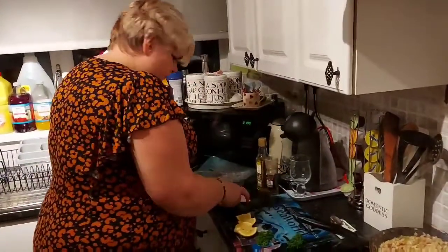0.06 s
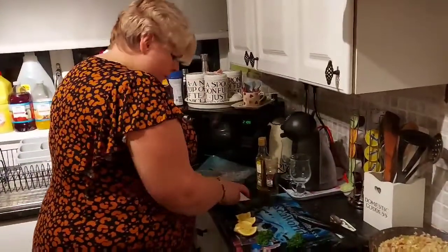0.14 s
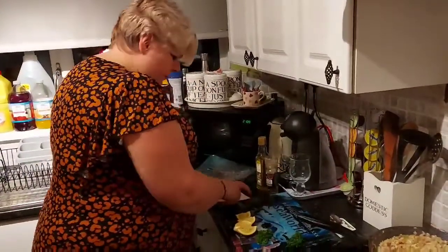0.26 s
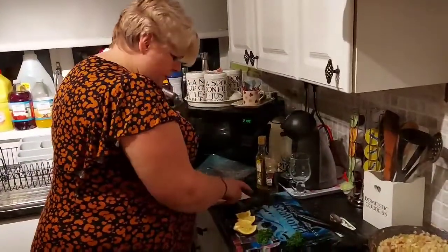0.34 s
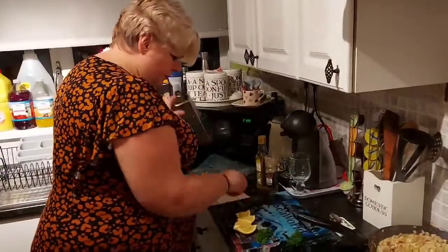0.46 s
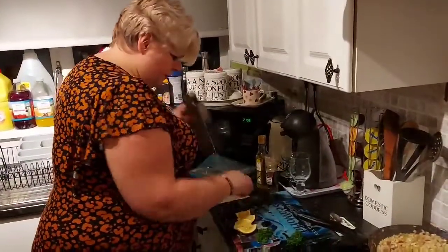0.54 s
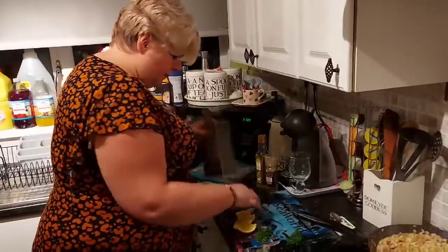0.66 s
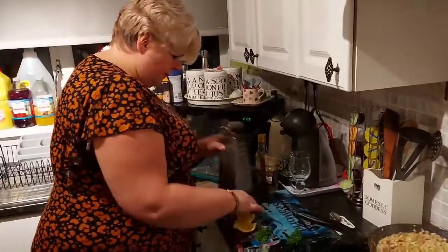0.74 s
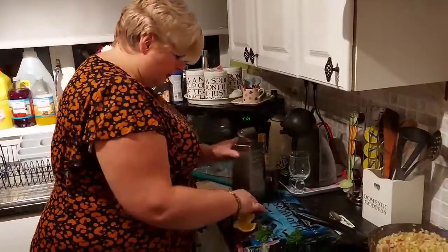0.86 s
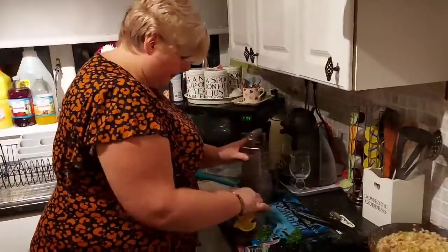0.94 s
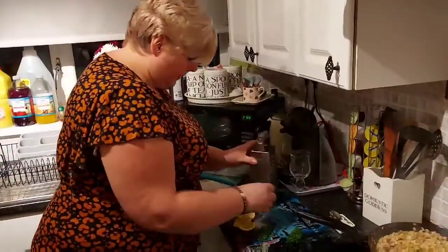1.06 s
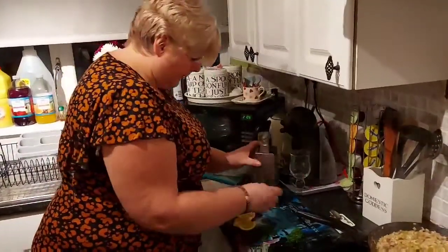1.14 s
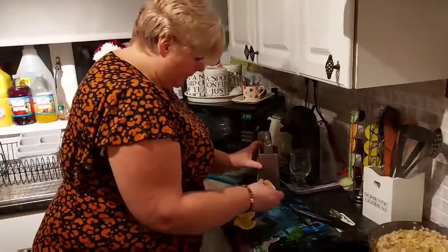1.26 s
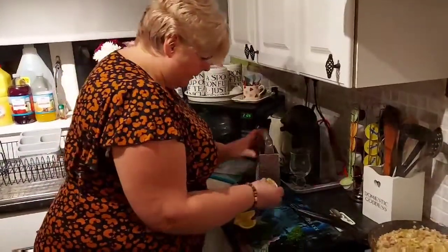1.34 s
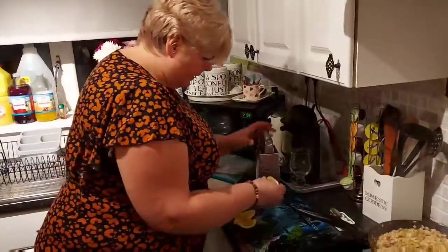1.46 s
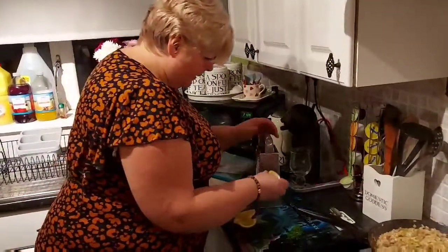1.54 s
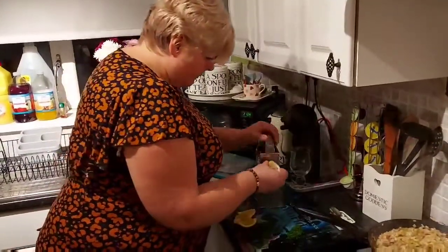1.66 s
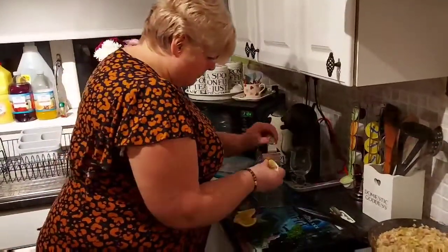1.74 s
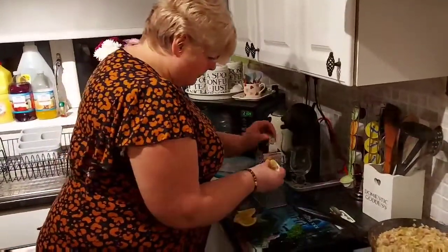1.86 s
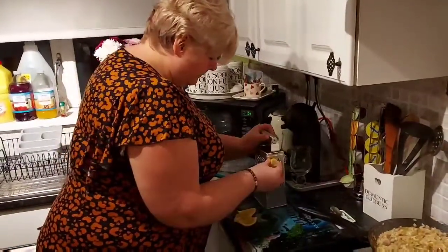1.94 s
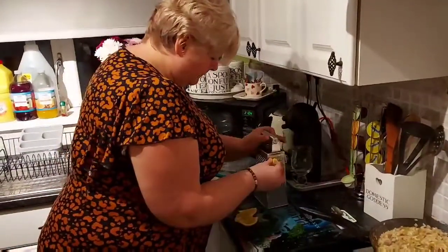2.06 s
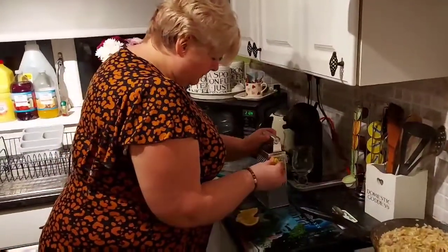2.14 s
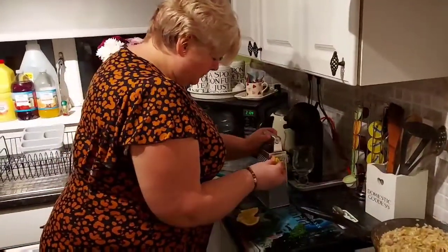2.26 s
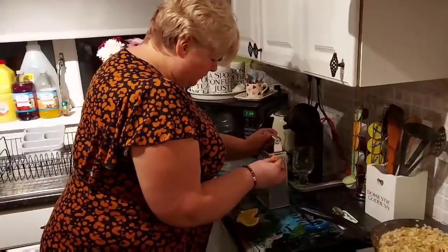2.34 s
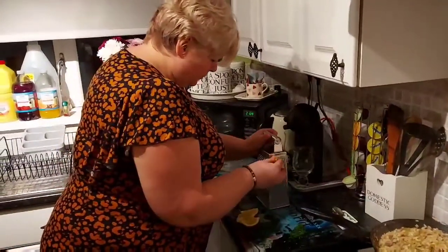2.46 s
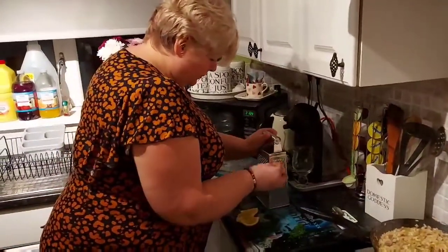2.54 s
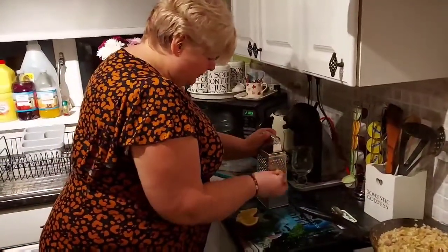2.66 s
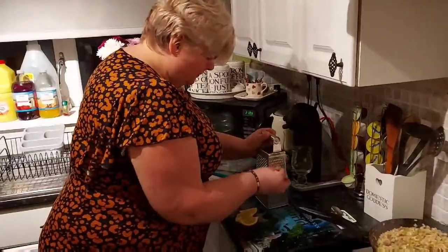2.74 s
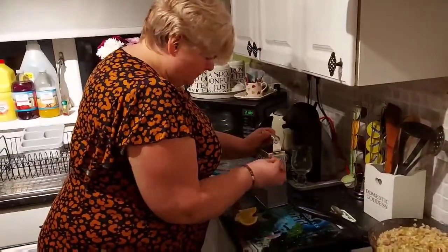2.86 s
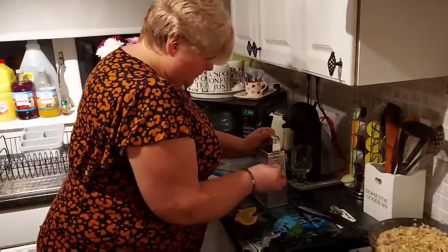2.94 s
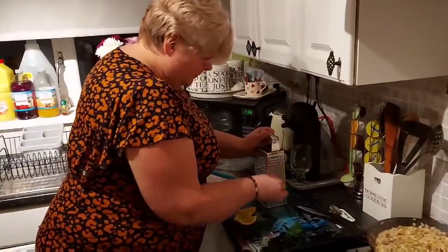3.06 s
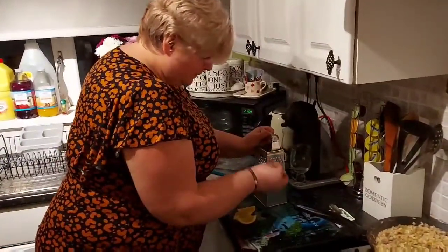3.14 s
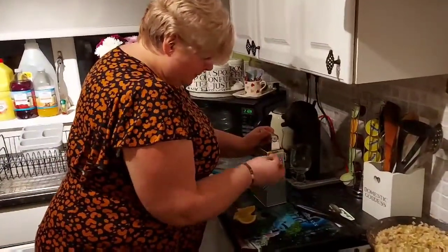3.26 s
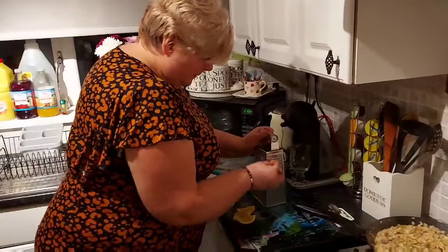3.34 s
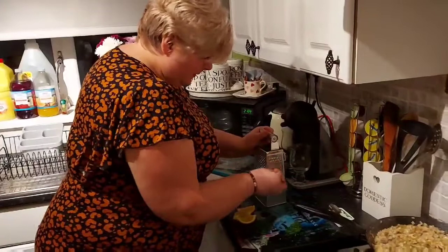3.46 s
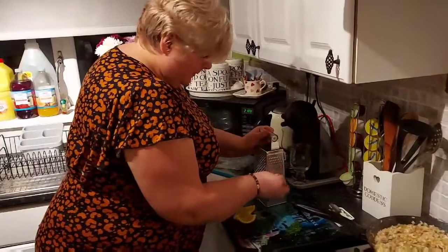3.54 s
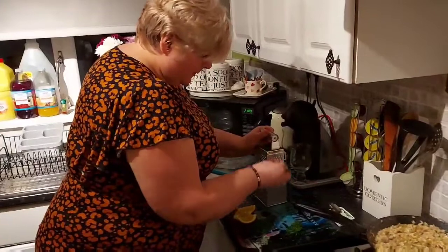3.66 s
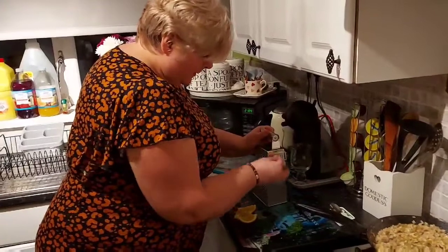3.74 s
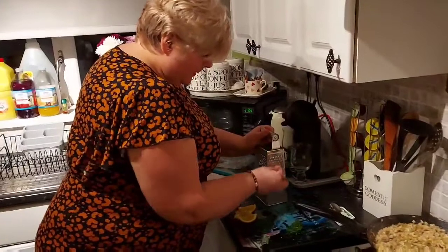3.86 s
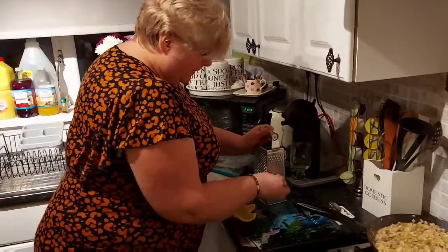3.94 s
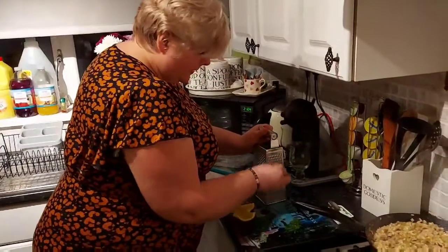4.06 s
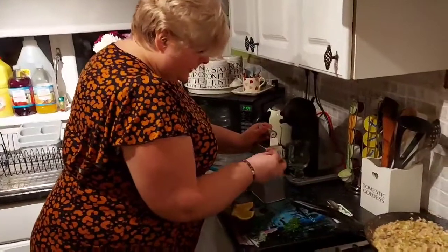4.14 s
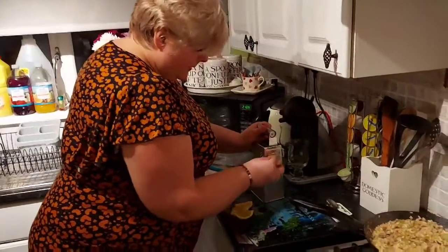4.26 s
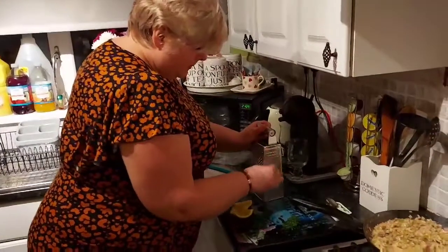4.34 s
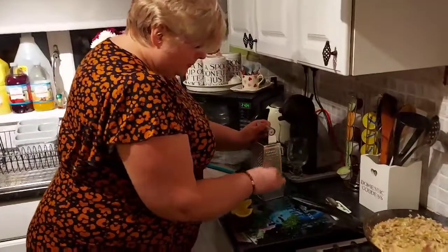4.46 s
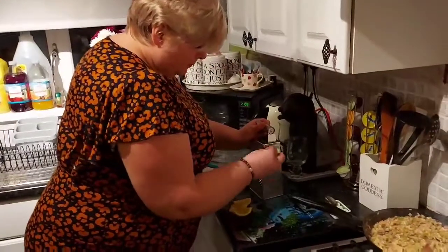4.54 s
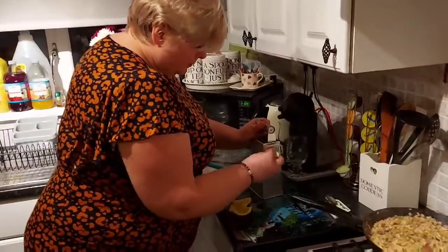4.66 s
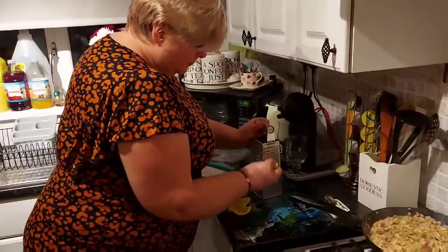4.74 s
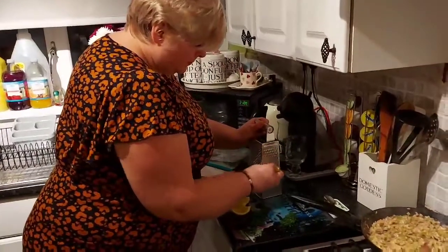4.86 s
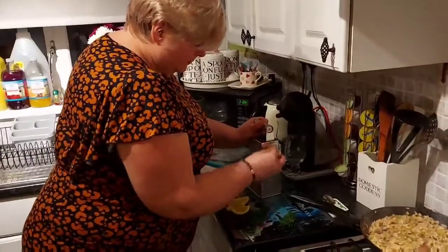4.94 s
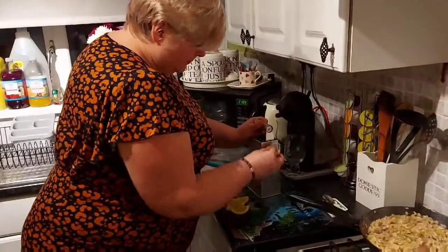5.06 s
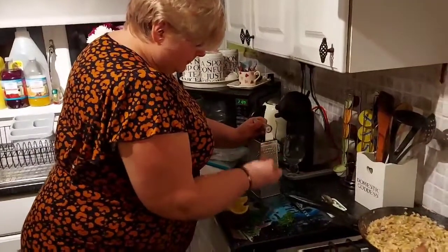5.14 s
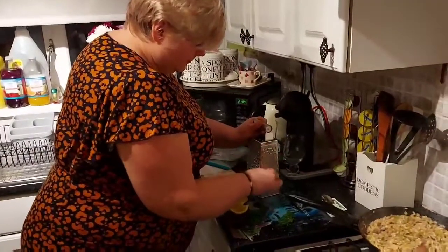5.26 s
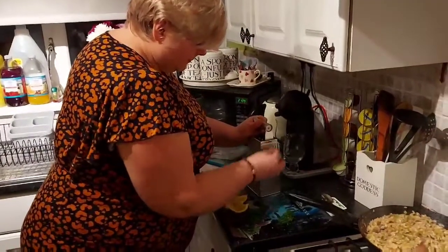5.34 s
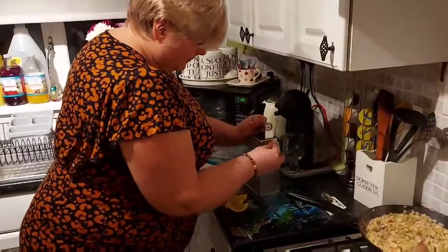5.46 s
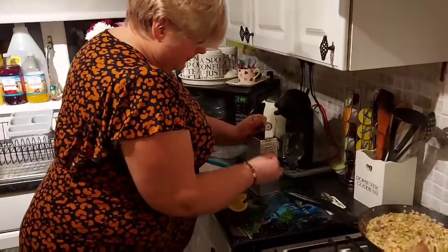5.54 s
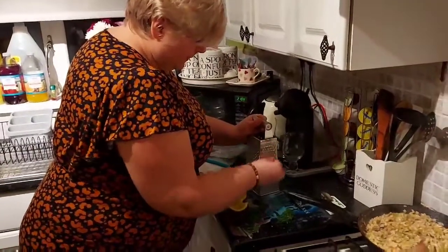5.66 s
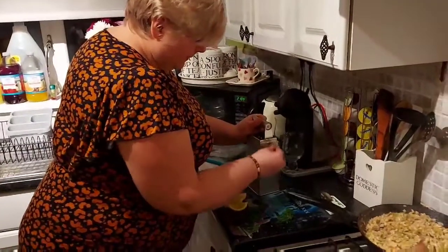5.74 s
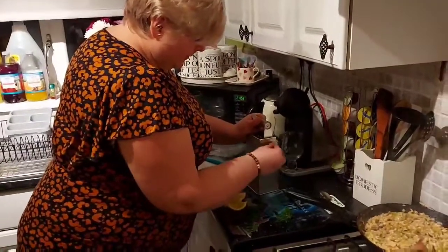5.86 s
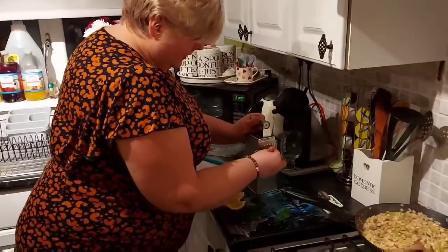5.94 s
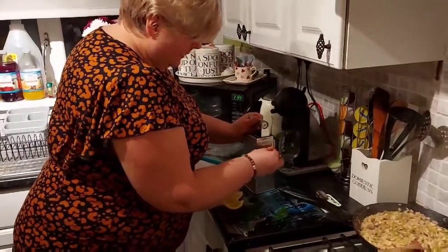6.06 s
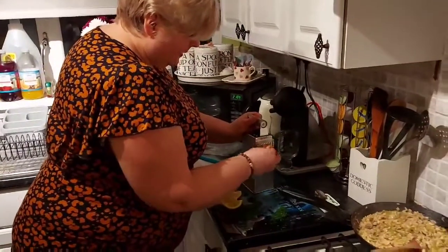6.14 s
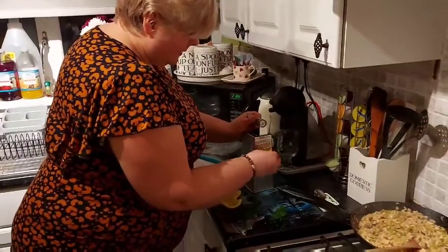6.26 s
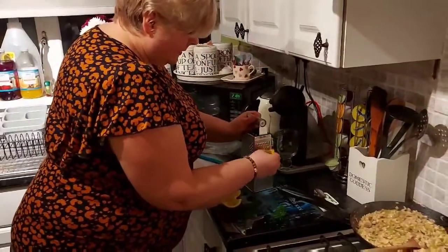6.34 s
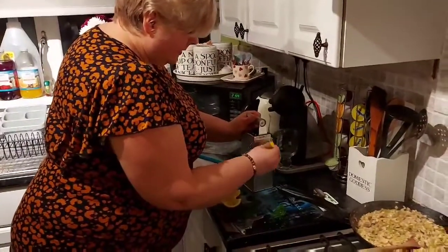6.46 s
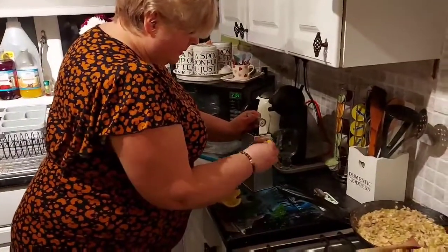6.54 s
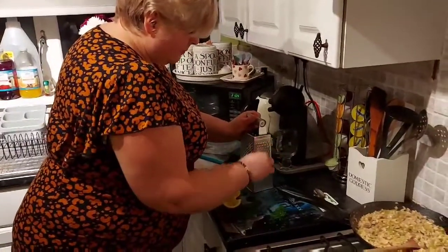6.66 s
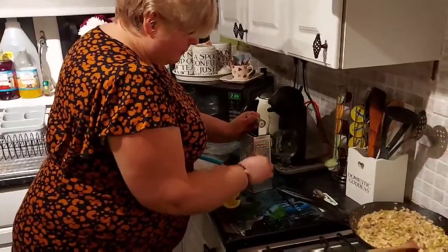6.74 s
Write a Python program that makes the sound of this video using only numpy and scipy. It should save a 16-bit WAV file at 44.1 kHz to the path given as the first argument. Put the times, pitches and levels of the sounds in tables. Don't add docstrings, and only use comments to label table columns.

```python
import sys
import numpy as np
from scipy import signal
from scipy.io import wavfile
from scipy.ndimage import uniform_filter1d

SR = 44100
rng = np.random.default_rng(int(sys.argv[2]) if len(sys.argv) > 2 else 0)


def digitize_waveform(pressure):
    field = np.atleast_2d(pressure).T
    bounded = np.clip(field, -1, 1)
    quanta = np.round(bounded * 32767).astype(np.int16)
    wavfile.write(sys.argv[1], SR, quanta)


def boost_factor(decibels):
    exponent = np.asarray(decibels, float) / 20
    return 10 ** exponent


N = 299412

# freq_hz, density_db_per_hz
HISS_SPECTRUM = [(20, -66), (70, 5), (105, -4), (170, -5.5), (400, -13), (1000, -10.5), (1400, -2),
                 (1900, -7.5), (3000, -7), (4200, -2), (5500, -5), (7500, -6.5), (11200, -5), (12400, 0),
                 (13500, -13)]
# freq_hz, likeness
HISS_LIKENESS = [(60, 0.87), (230, 0.53), (890, -0.031), (3440, -0.047), (13300, -0.023)]
# freq_hz, t60_s
KITCHEN_T60 = [(100, 0.49), (1000, 0.24), (4000, 0.23), (12000, 0.17)]
# freq_hz, likeness
ECHO_LIKENESS = [(60, 1), (300, 0.78), (700, 0.45), (1500, 0.17), (13000, 0.21)]
# start_s, peak_db, ring_hz
TICKS = [
    (0.182, -32, 5780),
    (0.5628, -41.5, 2290),
    (0.5714, -43, 2190),
    (0.589, -63, 4300),
    (0.6006, -46, 4260),
]
# start_s, peak_db
BUMPS = [
    (0.249, -61),
    (0.268, -49.5),
    (0.279, -47),
    (0.288, -43),
    (0.324, -48),
    (6.454, -65.5),
    (6.679, -63),
]
# freq_hz, level_db, t60_s
CUPBOARD_MODES = [(147.4, -1.5, 0.13), (247, 1.5, 0.17), (302.3, -14, 0.64), (332, -4, 0.09),
                  (426, 9.5, 0.03), (489, -9.5, 0.078), (700, 4.5, 0.031), (954, 9.5, 0.013)]
MODE_HZ = [88, 147, 269, 303, 435, 643, 681, 908, 1104, 1446, 1548, 1677, 1810, 2155, 2362, 2477, 2906,
           3110, 3616, 4058, 4565, 5010, 5580]
# width_hz, level_db
MODE_WIDTH_LEVEL = [(19.44, -12), (14, -6.5), (16.4, 0), (15.4, -4), (22, -11), (21.4, -4.5), (18.3, -36),
                    (13.3, 3.5), (13.9, -1.5), (20, -1.5), (16.8, -16), (5.1, -5.5), (11.7, 1), (21.6, -5),
                    (26, 1), (10.9, -7), (15.1, 0.5), (20.2, -4.5), (24, -2), (12, -25), (26, -26),
                    (20, -30), (21.6, -6.5)]
# freq_hz, density_db_per_hz
WEAK_MODES = [(90, -26.5), (180, -18.5), (280, -26.5), (400, -21), (560, -5), (900, -18), (1500, -4.5),
              (2980, -12), (3450, -16.5), (4190, -9.5), (7000, -17), (11000, -17.5), (12000, -18.5),
              (13500, -30)]
# freq_hz, t60_s
WEAK_T60 = [(100, 0.23), (1000, 0.23), (4000, 0.13), (12000, 0.15)]
BAND_EDGES_HZ = [0, 180, 480, 1600, 5000, 22050]
# start_s, peak_db, weight_db, tooth_db, fizz_db (tooth, fizz above wall ring)
KNOCKS = [(1.221, -21.5, 7, 3.5, -10), (1.249, -34.5, 2.5, -18.5, -15), (1.333, -28.5, 7, -12, -20),
          (1.367, -21.5, 0, -4.5, -28), (1.462, -32.5, -16, -13, -3), (2.005, -25.5, 7, -8.5, -21),
          (2.096, -26, 9, -5, -19), (2.214, -41, -16, -3.5, -13), (2.503, -47.5, -17, -5, -21),
          (3.138, -64, -3, 2, -7), (3.519, -42.5, -8, 0, 5.5), (4.061, -25, -11, 5.5, -10),
          (4.423, -53, 8, -7, 17), (5.266, -29.5, 1, 9.5, -1), (5.676, -57, -8, 6, -13),
          (6.061, -34.5, -0.5, 0.5, -2.5), (6.347, -47, 0, 5, -6), (6.7, -51, 0, -21, -20)]
# touch_s, swell_s, hold_s, full_pressure_db, swell_gain_db
SLIDES = [
    (1.222, 0.023, 0.022, -31.5, 19),
    (1.328, 0.013, 0.018, -37, 7),
    (1.365, 0.016, .04, -38, 3),
    (1.455, 0.027, 0.025, -38.5, 1.5),
    (1.545, 0.0075, 0.024, -47, 4),
    (1.86, 0.138, 0.014, -45, 9),
    (2.006, 0.016, 0.09, -46, 12),
    (2.097, 0.0035, 0.028, -41, -11.5),
    (2.214, 0.0063, 0.01, -52, -12),
    (2.49, 0.038, 0.043, -68, 1),
]
# touch_s, swell_s, hold_s, full_pressure_db, swell_gain_db
LEANS = [
    (2.7, 0.071, 0.036, -71.5, 7.6),
    (3.09, 0.052, 0.033, -74, 6.4),
    (3.455, 0.037, 0.13, -69, 5.5),
    (4.77, 0.026, 0.17, -67.5, 1.4),
]
# touch_s, swell_s, hold_s, full_pressure_db, swell_gain_db
STROKES = [(2.728, .11, 0.037, -40.5, 11), (3.138, 0.089, 0.028, -34.5, 7),
           (3.515, 0.041, 0.038, -41.5, 7.5), (3.645, 0.029, 0.054, -35, 2.5),
           (3.972, 0.068, 0.059, -38, 2.5), (4.066, 0.059, 0.019, -34.5, 0), (4.27, 0.056, 0.1, -59.5, 1.5),
           (4.425, 0.12, 0.041, -32, 9.5), (4.856, 0.11, 0.026, -32, 9), (5.1, 0.033, 0.06, -65, -10.5),
           (5.272, 0.036, 0.038, -34, 5.5), (5.33, 0.027, 0.046, -30.5, 0),
           (5.682, 0.061, 0.069, -32.5, 11), (5.97, .02, .03, -72.5, -9.5),
           (6.072, 0.0066, 0.0065, -50, -6.5)]
# freq_hz, leaning
DROPOUT_LEANING = [(1500, .3), (1900, 1.15), (3400, 1.15), (4000, .3), (13000, .1)]

GRATING_START_S = 2.68
SLIDE_TOUCH_DB, SLIDE_LIFT_DB = (-4.5, -2.5, -12), (0, -3.5, -16)
STROKE_TOUCH_DB, STROKE_LIFT_DB = (-10, 2, -5), (-6, 0.5, -9.5)
LEAN_DB = (11, -13, -24)
SLIDE_DB_PER_S, STROKE_DB_PER_S = (3200, 29, 260), (600, 81, 464)
CLUMP_DB, WANDER_DB = -0.62, 1.23
KNOCK_BOOM_DB, KNOCK_THUMP_DB, THUMP_PER_WEIGHT = -11, -23.5, 1.1


def evened(x):
    return x / np.sqrt(np.mean(x ** 2) + 1e-20)


def read(points, hz):
    f, value = np.transpose(points)
    return np.interp(np.log(hz + 1), np.log(f + 1), value)


def drift(samples, count=1):
    noise = rng.standard_normal((N, count)).T
    return evened(uniform_filter1d(uniform_filter1d(noise, samples), samples))


def noise_pair(likeness, frames):
    a, b, c, d = rng.standard_normal((frames, len(likeness), 4)).T
    likeness = np.clip(likeness, -1, 1)[:, None]
    left, other = a + 1j * b, c + 1j * d
    return np.array([left, likeness * left + np.sqrt(1 - likeness ** 2) * other])


def dying_noise(colour_db, t60_s, likeness, length):
    hz = np.fft.rfftfreq(512, 1 / SR)
    t = np.arange(length // 128 + 5) * 128 / SR
    decay_db = 60 * t / np.maximum(read(t60_s, hz), 0.01)[:, None]
    z = noise_pair(read(likeness, hz), len(t)) * boost_factor(read(colour_db, hz)[:, None] - decay_db)
    tail = signal.istft(z, nperseg=512, noverlap=384)[1][:, :length]
    return tail / np.linalg.norm(tail[0])


def hiss():
    hz, frames = np.fft.rfftfreq(1024, 1 / SR), N // 256 + 5
    patches = rng.standard_normal((frames, 513)).T
    patches_db = evened(uniform_filter1d(uniform_filter1d(patches, 14, 0), 14, 1))
    z = noise_pair(read(HISS_LIKENESS, hz), frames) * boost_factor(read(HISS_SPECTRUM, hz)[:, None] + patches_db)
    return boost_factor(-56) * evened(signal.istft(z, nperseg=1024, noverlap=768)[1][:, :N])


def kitchen(x):
    tail = dying_noise([(50, -3), (13000, 4.5)], KITCHEN_T60, ECHO_LIKENESS, SR // 2)
    delayed = np.pad(x.mean(0), (200, 0))[None]
    return signal.fftconvolve(delayed, tail, axes=1)[:, :N]


def ticks():
    t, out = np.arange(SR // 2) / SR, np.zeros(N)
    for start_s, peak_db, ring_hz in TICKS:
        grit = rng.standard_normal(len(t))
        ring = np.sin(2 * np.pi * ring_hz * t + np.cumsum(0.19 * grit)) / 3
        ring = ring + 0.22 * np.diff(grit, prepend=0)
        out[round(start_s * SR):][:len(t)] += boost_factor(peak_db - 7 - 60 * t / 0.1) * ring
    return out


def cupboard_bumps():
    t, out = np.arange(SR // 2) / SR, np.zeros(N)
    for start_s, peak_db in BUMPS:
        ring = np.zeros(len(t))
        for hz, level_db, t60_s in CUPBOARD_MODES:
            ring += boost_factor(level_db - 60 * t / t60_s) * np.sin(2 * np.pi * hz * t + rng.uniform(0, 2 * np.pi))
        push = boost_factor(peak_db - 5) * ring * np.minimum(t / 0.005, 1)
        part = out[round(start_s * SR):][:len(t)]
        part += push[:len(part)]
    return out


def box(soft_hz, grip, length=8192):
    t, clear = np.arange(length) / SR, np.zeros((2, length))
    for hz, (width_hz, level_db) in zip(MODE_HZ, MODE_WIDTH_LEVEL):
        spot_db = 2.34 * rng.standard_normal()
        phase = rng.uniform(0, 2 * np.pi) + rng.standard_normal((2, 1)) * hz / 2230
        decay = np.exp(-np.pi * grip * width_hz * t)
        ring = decay * np.sin(2 * np.pi * hz * t + phase) * np.minimum(t * hz, 1)
        clear += boost_factor(level_db + spot_db) * np.sqrt(width_hz) * ring
    answer = boost_factor(-4.5) * clear / np.linalg.norm(clear[0])
    answer = answer + dying_noise(WEAK_MODES, WEAK_T60, ECHO_LIKENESS, length)
    answer = signal.lfilter(*signal.butter(1, soft_hz, fs=SR), answer)
    bands = []
    for lo, hi in zip(BAND_EDGES_HZ, BAND_EDGES_HZ[1:]):
        low_pass = signal.butter(3, min(hi, SR / 2 - 9), fs=SR, output="sos")
        high_pass = signal.butter(3, max(lo, 72), "high", fs=SR, output="sos")
        band = signal.sosfilt(high_pass, signal.sosfilt(low_pass, answer))
        bands.append(band / np.linalg.norm(band[0]))
    thump, boom, wall, tooth, fizz = bands
    return [wall, boom, tooth, fizz, thump]


def pressure(rows, touch_db, lift_db, slopes_db_per_s, thump_db):
    t, power = np.arange(N) / SR, np.zeros((5, N))
    land, sag, lift = slopes_db_per_s
    for touch_s, swell_s, hold_s, full_db, swell_db in rows:
        at = round(touch_s * SR)
        inside = slice(at - SR // 10, at + SR // 2)
        since = t[inside] - touch_s
        swell_s = swell_s + 1 / SR
        length_s = swell_s + hold_s
        wall_db = full_db - land * np.maximum(-since, 0)
        wall_db -= swell_db * np.clip(1 - since / swell_s, 0, 1)
        wall_db -= sag * np.maximum(since - swell_s, 0)
        wall_db -= lift * np.maximum(since - length_s, 0)
        done = np.clip(since / length_s, 0, 1)
        boom, tooth, fizz = [a + (b - a) * done for a, b in zip(touch_db, lift_db)]
        above_db = np.array([0 * boom, boom, tooth, fizz, boom + thump_db])
        power[:, inside] += boost_factor(wall_db + above_db) ** 2
    return np.sqrt(power)


def rubbing():
    rub = pressure(SLIDES, SLIDE_TOUCH_DB, SLIDE_LIFT_DB, SLIDE_DB_PER_S, thump_db=-7)
    rub += pressure(STROKES, STROKE_TOUCH_DB, STROKE_LIFT_DB, STROKE_DB_PER_S, thump_db=-10)
    rub += pressure(LEANS, LEAN_DB, LEAN_DB, STROKE_DB_PER_S, thump_db=-7)
    bite = drift(350)[0]
    wander = np.array([np.roll(bite, k * N // 6) for k in range(1, 6)])
    return boost_factor(-1.5) * rub * evened(boost_factor(CLUMP_DB * bite + WANDER_DB * wander))


def knocks():
    blow, n = np.zeros((5, N)), np.arange(600)
    envelope = np.exp(-n / 118) * np.minimum(n / 60, 1)
    for start_s, peak_db, weight_db, tooth_db, fizz_db in KNOCKS:
        rattle = rng.standard_normal(600) * envelope
        boom_db = KNOCK_BOOM_DB + weight_db
        thump_db = KNOCK_THUMP_DB + THUMP_PER_WEIGHT * weight_db
        above_db = np.array([0, boom_db, tooth_db, fizz_db, thump_db])[:, None]
        at = round(start_s * SR)
        blow[:, at:at + 600] += boost_factor(peak_db + above_db + 1) * rattle
    return blow


def catches(per_s, spread_db):
    size = boost_factor(spread_db * np.minimum(rng.exponential(1, N), 5)) * rng.choice([-1., 1.], N)
    snags = evened(size * (rng.random(N) < per_s / SR))
    return evened(snags + 0.32 * rng.standard_normal(N))


def grater():
    rub, blow = rubbing(), knocks()
    shares = boost_factor(9.2 * drift(1200, count=5))
    shares = shares / np.linalg.norm(shares, axis=0)
    cut, out = round(GRATING_START_S * SR), np.zeros((2, N + 8192))
    for share in shares:
        force = share * (rub * catches(per_s=350, spread_db=3.64) + blow)
        moved, grated = box(soft_hz=770, grip=2.36), box(soft_hz=8600, grip=0.94)
        for start, stop, answers in ((0, cut, moved), (cut, N, grated)):
            for drive, answer in zip(force, answers):
                ring = signal.oaconvolve(drive[None, start:stop], answer, axes=1)
                out[:, start:stop + 8191] += ring
    return out[:, :N]


def scene():
    near = grater() + cupboard_bumps() + ticks()
    direct = np.array([np.roll(near[0], 3), near[1]])
    return boost_factor(3.5) * direct + boost_factor(-3) * kitchen(near) + hiss()


def top_cut(x):
    return signal.sosfilt(signal.butter(12, 13350, fs=SR, output="sos"), x)


def record(dry):
    low_pass = signal.firwin(511, 13300, window=("kaiser", 9), fs=SR)
    limited = signal.oaconvolve(dry, low_pass[None], "same")
    hz, t, z = signal.stft(limited, SR, nperseg=2048, noverlap=1536)
    chance = rng.standard_normal((len(t), len(hz))).T
    chance = evened(uniform_filter1d(uniform_filter1d(chance, size=9, axis=0), size=5, axis=1))
    level_db = 10 * np.log10((abs(z) ** 2).sum((0, 1)) + 1e-12)
    quiet = np.clip(1 - (level_db - np.percentile(level_db, 20)) / 15, 0, 1)
    hz = hz[:, None]
    leaning = read(DROPOUT_LEANING, hz) * quiet + 0.45 * (1 - quiet) * (hz > 4500)
    emptied = np.clip(6 * (chance - 1.9 + leaning), 0, 1) * (hz > 1500)
    loud = level_db + 2 * chance[-300] > np.percentile(level_db, 97)
    emptied = np.maximum(emptied, (hz > 12600) * loud)
    patchy_db = -1.6 * chance * np.clip(hz / 1170, 0, 1)
    z = z * boost_factor(patchy_db - 35 * emptied)
    mix = signal.istft(z, SR, nperseg=2048, noverlap=1536)[1][:, :N]
    return top_cut(mix)


dry = scene()
out = record(dry)
digitize_waveform(out)
```